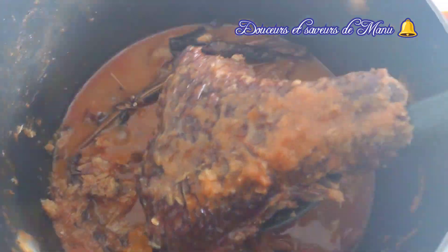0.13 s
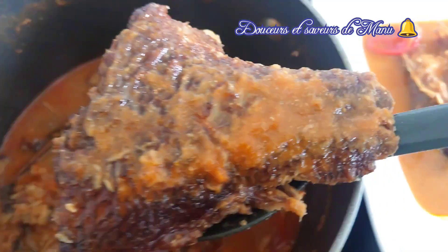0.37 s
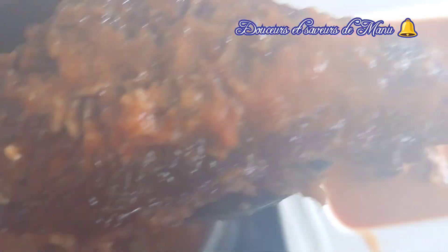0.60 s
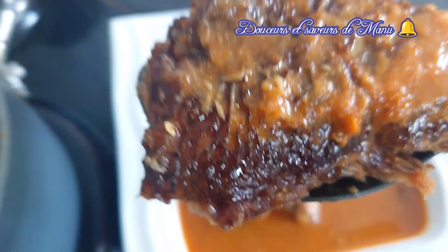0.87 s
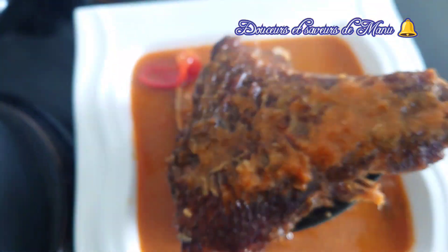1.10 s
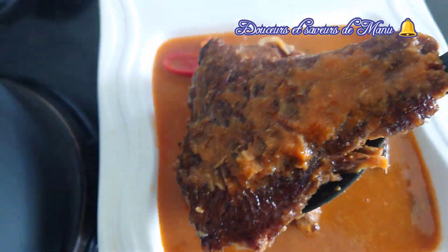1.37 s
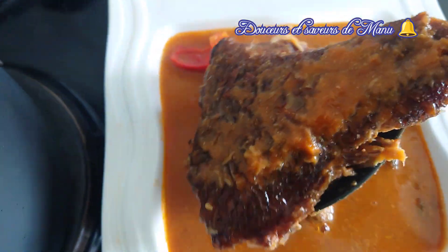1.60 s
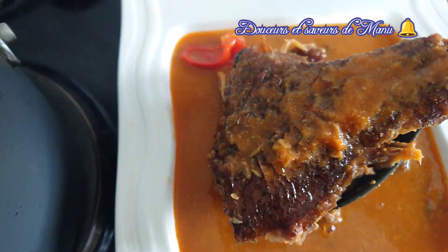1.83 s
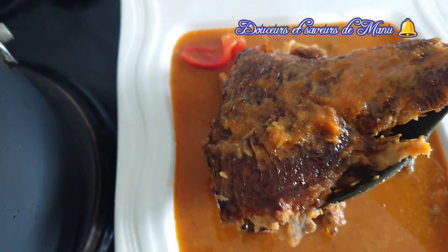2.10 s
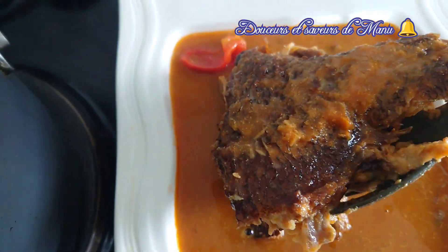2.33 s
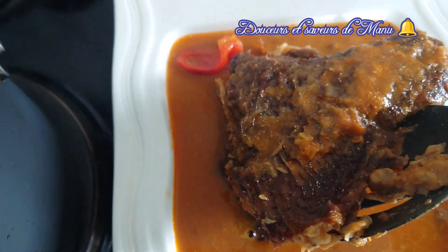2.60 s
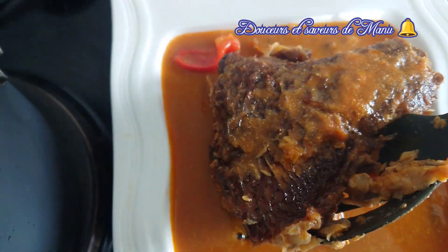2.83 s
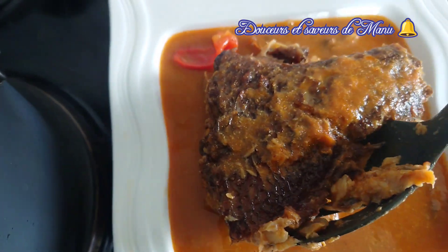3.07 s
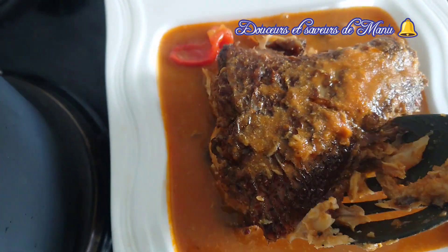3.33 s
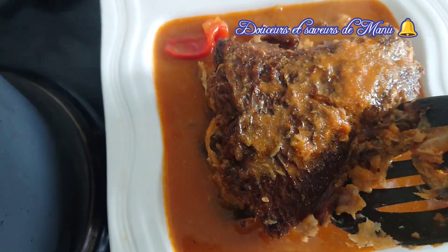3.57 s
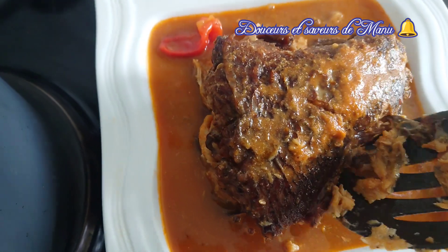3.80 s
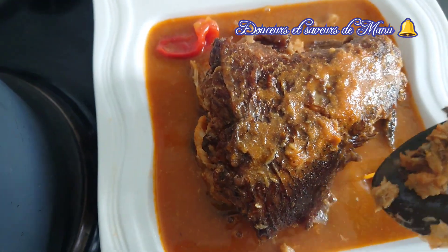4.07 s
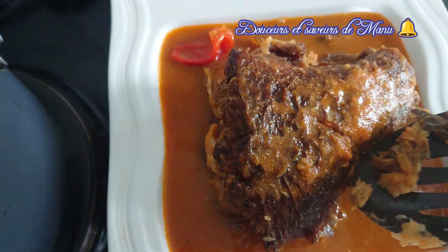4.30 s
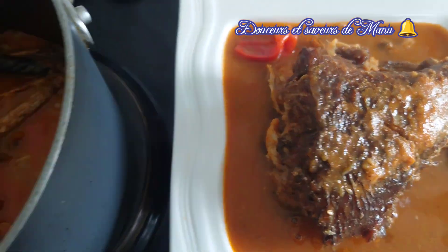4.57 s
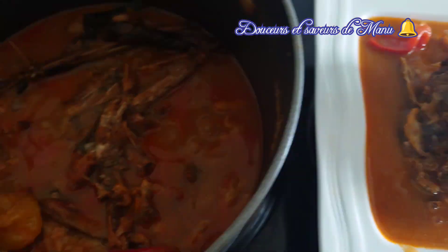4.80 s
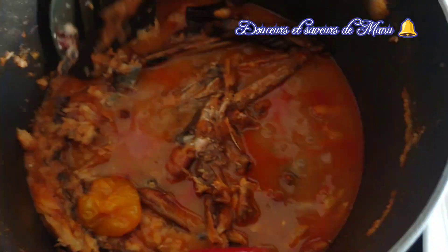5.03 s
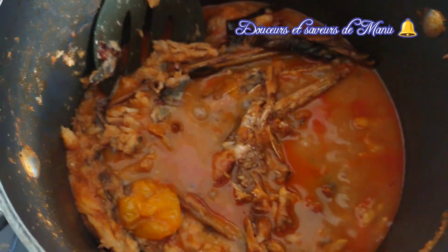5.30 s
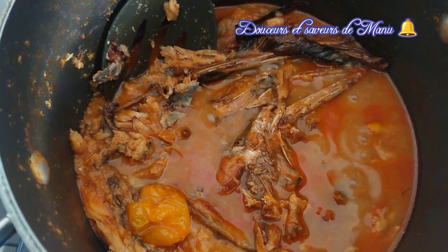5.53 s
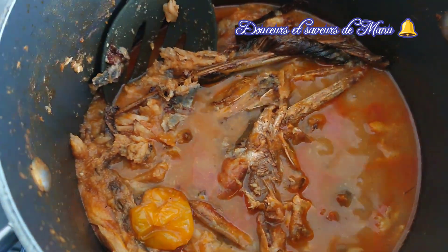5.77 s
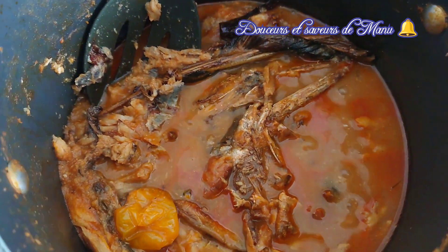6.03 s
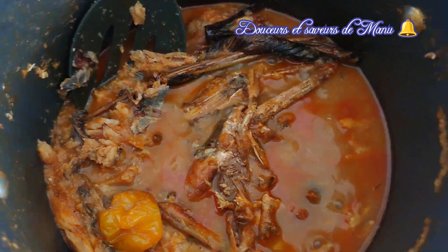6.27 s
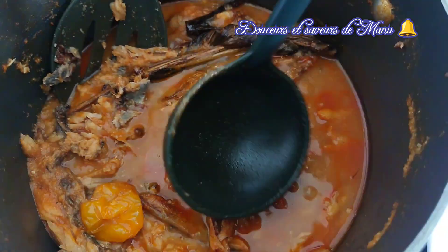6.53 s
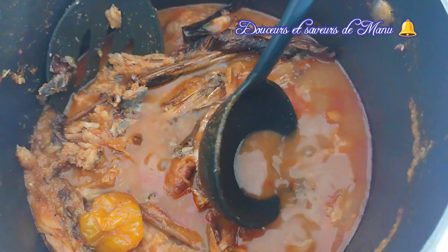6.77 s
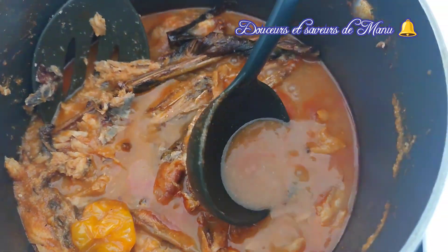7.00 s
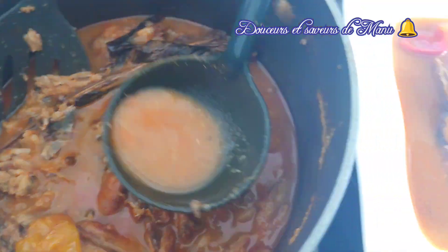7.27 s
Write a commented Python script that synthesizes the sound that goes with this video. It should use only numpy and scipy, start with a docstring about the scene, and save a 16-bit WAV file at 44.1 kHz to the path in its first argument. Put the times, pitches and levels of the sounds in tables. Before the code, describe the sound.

Thick sauce bubbles quietly in a pot, fainter as the microphone swings to a plate, then close again with utensil knocks and a short ladle scrape.

```python
"""Kitchen: a thick sauce simmers in a steel pot, heard by a hand-held microphone pair that swings aside to a plate
and back over the pot. Swarms of damped rings make the bubbling and fizz; single bursts make sharper snaps and plops.
A spatula and a ladle knock the pot (decaying modes, noise cracks, a click and a low thump) and the ladle scrapes
it once (resonant noise). The hand's rumble and rustle and the kitchen hush are filtered noise; sparse decaying
echoes surround pot and knocks."""
import sys
import numpy as np
from scipy import signal
from scipy.io import wavfile
from scipy.ndimage import uniform_filter1d, map_coordinates

SR = 44100
rng = np.random.default_rng(int(sys.argv[2]) if len(sys.argv) > 2 else 0)


def unload_wav(signal):
    """Save mono or channel-first audio to the path in sys.argv[1] as 16-bit WAV at rate SR, clipped to [-1, 1]."""
    wavfile.write(
        sys.argv[1],
        SR,
        np.round(np.clip(np.atleast_2d(signal).T, -1, 1) * 32767).astype(np.int16),
    )


def magnitude_from_level(level_db):
    """Linear magnitude for a level in decibels (20 dB per decade)."""
    exponent = np.asarray(level_db, float) / 20
    return 10 ** exponent


N = 325458

# Swing of the microphones. Each row: time in seconds, turn away from the pot (0-1).
ASIDE = [(0, 0.12), (.5, 0.26), (1.0, 0.86), (4.5, 0.89), (5.2, 0.39), (5.6, 0.09), (6.3, 0.23), (6.8, 0.3),
         (7.38, 0.1)]
# Port balance turned aside. Each row: frequency in Hz, left over right in dB.
SHADOW = [(60, 42), (200, -13), (500, -5), (1300, 18.5), (2400, 5.5), (4400, 20), (8000, -6.5), (15000, 44)]
# Port balance over the pot. Each row: frequency in Hz, left over right in dB.
FACING = [(60, 45), (180, 2.5), (550, 1.5), (1650, 8), (4970, 7), (15000, -2)]
# Spectrum of the fizz. Each row: frequency in Hz, relative density in dB per Hz.
FIZZ = [(1650, -32.5), (2800, -7), (3360, -6.5), (3830, 2), (4150, 0.5), (5850, 5.5), (6670, -9),
        (8000, -35), (10200, -16), (14400, -59), (16000, -30)]
# Likeness of the two ports in background noise. Each row: frequency in Hz, left-right likeness (0-1).
ALIKE = [(30, 0.71), (130, 0.78), (400, 1), (1000, 0.064), (4000, 0.021)]


def evened(x):
    """Scales to rms 1."""
    return x / np.sqrt(np.mean(x ** 2) + 1e-20)


def read(points, hz):
    """A spectrum table at the given frequencies, interpolated over log frequency."""
    f, value = np.transpose(points)
    return np.interp(np.log(hz + 1), np.log(f + 1), value)


def curve(rows):
    """A time table at every sample."""
    s, value = np.transpose(rows)
    return np.interp(np.arange(N) / SR, s, value)


def turned_aside():
    """Turn away from the pot at every sample, 0-1."""
    return np.clip(curve(ASIDE), 0, 1)


def coloured(x, points, share=1):
    """Causal minimum-phase filter with the gain of a spectrum table, its dB scaled by share."""
    db = share * read(points, abs(np.fft.fftfreq(4096, 1 / SR)))
    log_gain = np.log(magnitude_from_level(np.maximum(db, -100)))
    taps = np.fft.ifft(np.exp(np.conj(signal.hilbert(log_gain)))).real[:2048]
    return signal.oaconvolve(x, taps[None] if x.ndim > 1 else taps, axes=-1)[..., :x.shape[-1]]


def add(mix, s, sound, pan_db=0):
    """Mixes a sound in at a time, left over right by pan_db."""
    part = mix[:, round(s * SR):][:, :sound.shape[-1]]
    part += magnitude_from_level([[pan_db / 2], [-pan_db / 2]]) * sound[..., :part.shape[1]]


def burst(hz, cycles, rise):
    """A damped ring whose pitch climbs from hz, as a bubble's does while its cavity opens."""
    turns = np.arange(round(3 * cycles * SR / hz)) * hz / SR
    return np.exp(-turns / cycles * 2) * np.sin(2 * np.pi * turns * (1 + rise * turns / cycles))


def random_sizes(chance, spread_db):
    """Bursts at random samples, with exponentially spread levels in dB."""
    return magnitude_from_level(spread_db * np.minimum(rng.exponential(1, N), 4)) * (rng.random(N) < chance)


def swarm(lo_hz, hi_hz, per_s, spread_db, cycles, dense, tick, count=28):
    """Clumped bursts of many pitches at random moments over a dense noise bed of tiny ones."""
    clumps = magnitude_from_level(3.0 * evened(uniform_filter1d(rng.standard_normal(N), 1500)))
    out = np.zeros(N)
    for hz in np.geomspace(lo_hz, hi_hz, count):
        sizes = random_sizes(clumps * per_s / count / SR, spread_db)
        bubble = burst(hz, cycles * rng.uniform(1.0, 1.08), 0.05)
        bubble[1] += tick  # the skin tears with a tick across all bands
        out += signal.oaconvolve(sizes, bubble * np.sqrt(hz) / np.linalg.norm(bubble))[:N]
    return evened(evened(out) + dense * rng.standard_normal(N))


def simmer():
    """Low bubbling rings the air in the pot; the fizz above it is small bursts at the surface."""
    # Strength of the bubbling. Each row: time in seconds, level in dB.
    strength = [(0.0, -55.5), (0.37, -55.5), (0.74, -55), (1.09, -62.5), (1.31, -63.5), (1.93, -56.5),
                (2.67, -56.5), (3.33, -61), (3.62, -59.5), (4.77, -58), (5.22, -49.5), (5.86, -54.5),
                (6.04, -49), (6.49, -51.5), (7.09, -50.5), (7.38, -53.5)]
    # Bubbling turned aside. Each row: frequency in Hz, relative density in dB per Hz.
    bubbling_far = [(88, -45.5), (150, -3.5), (323, -4), (554, 2.5), (948, -9.5), (1270, -4), (1500, -11),
                    (1710, -22.5), (1920, -7), (2150, -15), (2350, -8.5), (2820, -22), (3200, -12),
                    (4160, -65), (7040, -120)]
    # Bubbling over the pot. Each row: frequency in Hz, relative density in dB per Hz.
    bubbling_near = [(88, -48.5), (150, -24), (285, -1.5), (540, -5), (637, -2.5), (1040, -10.5),
                     (1310, -10.5), (2380, -18), (3200, -26.5), (4160, -71), (7040, -120)]
    mean_db, fizz_db, spits_db = -55.5, -66, -82.5  # fizz and spits: level where the simmer is at mean_db
    fizz_follows = 1.13  # the fizz swings more than the bubbling
    aside, simmer_db = turned_aside(), curve(strength)

    bubbles = swarm(207.5, 2810, 900, 3.73, 4.95, 0.57, 0.39)
    gulps = swarm(244, 2890, 800, 4.43, 2.2, 0.23, 0.13)  # close up, the bubbles are short round pulses
    low = aside * evened(coloured(bubbles, bubbling_far))
    low += (1 - aside) * evened(coloured(gulps, bubbling_near))
    crackle = swarm(3300, 7000, 900, 4.6, 7, .35, .55)
    high = evened(coloured(crackle, FIZZ))
    lively = magnitude_from_level(fizz_follows * (simmer_db - mean_db))
    sauce = magnitude_from_level(simmer_db) * low + magnitude_from_level(fizz_db) * lively * high
    # the housing shadows one port more as it turns away
    heard = np.array([aside * coloured(sauce, SHADOW, side) + (1 - aside) * coloured(sauce, FACING, side)
                      for side in (.5, -.5)])
    return heard + magnitude_from_level(spits_db) * lively * spits()


def spits():
    """Sparse sharp ticks of skin tearing at random: decaying noise that reaches the top of the treble."""
    per_s, spread_db, decay_s = 51, 2, 0.00088
    sizes = random_sizes(per_s / SR, spread_db)
    swell = signal.lfilter([1], [1, -np.exp(-1 / (decay_s * SR))], sizes)
    noise = rng.standard_normal((2, N))
    return evened(np.gradient(np.gradient(noise, axis=1), axis=1) * swell)


def pops():
    """Bright snaps and round plops of large bubbles; the snap at 5.119 s is a knock's bright click."""
    # Each row: start in seconds, nominal level in dB, starting pitch in Hz, relative edge level in dB.
    snap_rows = [(0.2214, -44, 4760, -41), (0.35, -34.5, 4570, -49), (0.4626, -43.5, 4770, -18),
                 (0.58, -47, 5770, -17), (0.6608, -40, 5000, -42), (0.7347, -45.5, 5900, -15),
                 (0.9306, -48.5, 3680, -44), (1.8714, -41, 5100, -46), (1.907, -48, 4270, -37),
                 (2.0593, -44, 6000, -32), (2.088, -51, 4950, -12), (2.1264, -39.5, 5180, -39),
                 (2.4584, -47.5, 5850, -40), (2.701, -45.5, 4470, -8.5), (2.7427, -51, 4280, -30),
                 (3.406, -55, 5760, -11), (3.5476, -54.5, 3660, -8), (3.5669, -48.5, 5800, -30),
                 (4.067, -49, 4530, -40), (4.356, -52, 4700, -32), (4.8995, -50, 5390, -25),
                 (4.933, -42.5, 5230, -12), (4.998, -37, 5930, -24), (5.064, -38, 5960, -24),
                 (5.0955, -44, 4560, -15), (5.119, -41.5, 4470, -8), (5.356, -46.5, 5150, -28),
                 (5.473, -46, 4670, -13), (5.6123, -40, 5300, -34), (5.6717, -43, 5470, -42),
                 (5.8997, -46, 6440, -23), (6.369, -46.5, 4900, -37), (6.4446, -45, 4560, -17),
                 (6.497, -46, 5770, -37), (6.7285, -47, 5570, -32), (6.923, -44.5, 5830, -13),
                 (7.016, -45.5, 5930, -16), (7.208, -46, 5900, -24)]
    # Each row: start in seconds, nominal level in dB, starting pitch in Hz.
    plop_rows = [(0.048, -41.5, 470), (0.104, -37.5, 546), (0.133, -38.5, 494), (0.162, -37.5, 689),
                 (0.189, -37.5, 790), (0.219, -39, 656), (0.242, -39, 651), (0.262, -47, 535),
                 (0.275, -35.5, 690), (0.39, -41, 1010), (0.398, -37, 690), (0.432, -40, 656),
                 (0.463, -36.5, 665), (0.501, -42, 623), (0.535, -37.5, 655),  (1.187, -43, 1240),
                 (1.465, -40.5, 1240), (1.595, -42.5, 1890), (1.692, -46, 1890), (1.774, -43, 1330),
                 (1.834, -43.5, 1270), (2.125, -49, 1250), (2.984, -45.5, 1230), (3.231, -47, 1870),
                 (3.71, -48, 1100), (3.955, -45.5, 1250), (3.999, -43.5, 2340), (4.044, -39, 1270),
                 (4.453, -45, 1300), (4.454, -45, 1850), (5.242, -38.5, 596), (5.409, -36, 650),
                 (5.899, -34, 617), (6.383, -37.5, 1250), (6.456, -39, 716), (6.495, -39, 545),
                 (6.55, -35.5, 624), (6.746, -38, 568), (6.8, -32.5, 2390), (7.0, -37.5, 651)]
    snaps_left_db = 15.5
    out = np.zeros((2, N))
    t = np.arange(400) / SR
    swell = (1 - np.exp(-t / .0005)) * np.exp(-t / .0011)
    for s, db, hz, edge_db in snap_rows:
        spray, edge = rng.standard_normal((2, 400))
        spray = coloured(coloured(spray * swell, FIZZ), [(6500, 7.5), (9000, -6.5)])
        snap = magnitude_from_level(1) * spray / abs(spray).max()
        snap += magnitude_from_level(edge_db + 7.5) * np.gradient(np.gradient(edge)) * swell
        add(out, s, magnitude_from_level(db) * burst(hz, 7, .02), snaps_left_db)
        add(out, s, magnitude_from_level(db) * snap, snaps_left_db)
    turn = turned_aside()
    for s, db, hz in plop_rows:
        aside = turn[round(s * SR)]
        pan_db = aside * read(SHADOW, hz) + (1 - aside) * read(FACING, hz)
        add(out, s, magnitude_from_level(db) * burst(hz, 0.74 + hz / 300, 0.02), pan_db)
        splash = burst(2.3 * hz, 1.9, 0.092) * (1 - aside)  # heard close up
        add(out, s, magnitude_from_level(db - 8) * splash, pan_db)
    return out


def ring(modes, t):
    """Dying modes, excited a little differently by each blow; high ones reach the ports out of step."""
    hz, db, t60 = np.transpose(modes)[:, :, None]
    size, pitch, start, step = rng.standard_normal((4, len(modes), 1))
    phase = 2 * np.pi * hz * (1 + .006 * pitch) * t + .45 * start
    skew = step * np.minimum((hz / 2400) ** 2, 1.2)
    sound = magnitude_from_level(db + size - 60 * t / t60) * np.sin([phase + skew, phase - skew])
    return sound.sum(1) / np.linalg.norm(magnitude_from_level(db)) * (1 - np.exp(-t / 0.00025))


def knocks():
    """Each blow rings pot and utensil, duller the longer the contact, and cracks; soft bumps ring a hollow."""
    # Each row: start in seconds, nominal pot, utensil and crack levels in dB, contact time in ms.
    blows = [(5.119, -53, -39, -42, 0.22), (5.128, -31, -34, -46, 1.2), (5.963, -15.5, -58, -34.5, 0.19),
             (5.974, -9.5, -26, -38, 0.76), (5.986, -23, -23, -43.5, 0.56), (5.998, -25.5, -31, -42, 0.55),
             (6.012, -26, -40, -51, 0.65), (6.153, -18, -11.5, -17.5, 0.09), (6.1588, -28, -14, -48, 0.48),
             (6.168, -21, -24, -31, 0.17), (6.189, -25, -18.5, -27, 0.83), (6.196, -30, -17, -53, 2.8),
             (6.207, -19, -22, -60, 1.9), (6.222, -36, -27, -59, 4.3), (7.276, -49, -48, -38.5, .5),
             (7.292, -36, -30, -48, 0.7)]
    # Soft bumps sounding only the utensil's hollow. Each row: start in seconds, nominal level in dB.
    bumps = [(5.128, -36), (5.142, -40), (7.277, -37), (7.292, -27), (7.3005, -32), (7.309, -35),
             (7.331, -38)]
    # Modes of the hollow, pot and utensil. Each row: frequency in Hz, relative level in dB, t60 in seconds.
    hollow_modes = [(470, 0, .08), (100, -12, .2), (960, -16, .03)]
    pot_modes = [(287, -6.5, 0.061), (349, -7, 0.047), (473, 1.5, 0.094), (562, 4, 0.063), (645, 5, 0.07),
                 (772, 3, 0.06), (869, 10.5, 0.05), (1104, 1, 0.083), (1352, 5.5, 0.076), (1590, 13, 0.022),
                 (1760, 8.5, 0.028), (2000, 2, 0.098), (2010, -0.5, .05), (2310, -4, 0.098),
                 (2490, 12, 0.014), (2830, -0.5, 0.049), (4000, -11, 0.13)]
    utensil_modes = [(209, -20, 0.23), (281, -5.5, 0.057), (310, -13, 0.092), (385, 3.5, 0.062),
                     (522.6, 8, 0.063), (619, -1, 0.11), (742, 5.5, 0.034), (1470, -13.5, 0.076),
                     (2225, -2, 0.07), (2460, 6, 0.026), (4710, -10, 0.056)]
    # Balance of the blows before weighting per port. Each row: frequency in Hz, left over right in dB.
    balance = [(125, -3), (500, -4.5), (2000, -1), (4000, -1.3), (8000, 3), (12000, -3.5)]
    crack_side = 0.84  # noise opposed between the ports, relative to the common noise
    crack_colour = [(150, -11), (600, 1), (2400, 6.5), (3200, 1.0), (4800, 3.5), (6300, -4.0),
                    (8000, -19.5), (11000, -24.0), (16000, -37)]
    rattle_colour = [(150, -41), (300, -6), (900, -19), (2500, -30)]
    out, t = np.zeros((2, N)), np.arange(SR // 4) / SR
    for s, pot_db, utensil_db, crack_db, contact_ms in blows:
        crack = np.array([[1, crack_side], [1, -crack_side]]) @ rng.standard_normal((2, len(t)))
        crack = coloured(crack * (np.exp(-t / 0.0043) + 0.26 * np.exp(-t / 0.028)), crack_colour)
        body = magnitude_from_level(pot_db) * ring(pot_modes, t) + magnitude_from_level(utensil_db) * ring(utensil_modes, t)
        rattle = coloured(rng.standard_normal(len(t)), rattle_colour) * np.exp(-t / 0.028)  # loose parts
        body += magnitude_from_level(utensil_db - 2) * rattle
        soft = np.exp(-2 * np.pi / (max(contact_ms, .05) * SR / 1000))
        for _ in range(2):
            body = signal.lfilter([1 - soft], [1, -soft], body)
        body = coloured(body, [(20, -40), (140, -20), (260, 0), (16000, 0)])  # too small to push deep bass
        left, right = body + magnitude_from_level(crack_db) * crack
        add(out, s, np.array([coloured(left, balance, 0.35), coloured(right, balance, -0.63)]))
    for s, db in bumps:
        add(out, s, magnitude_from_level(db) * ring(hollow_modes, t) * (1 - np.exp(-t / 0.0018)))
    return out


def scrape():
    """The ladle sticks and slips: patchy noise through resonances squeals in one short stroke."""
    # Resonances of the squeal. Each row: frequency in Hz, width in Hz, relative level in dB.
    resonances = [(2750, 250, -8), (3500, 200, -6), (3900, 150, -2), (4850, 200, -1), (5500, 400, 0)]
    loudest_s, rise_s, fall_s, level_db = 7.25, 0.015, 0.012, -40
    stick_slip = magnitude_from_level(3 * evened(uniform_filter1d(rng.standard_normal(N), size=60)))
    rub = rng.standard_normal((2, N)) * stick_slip
    squeal = sum(magnitude_from_level(db) * evened(signal.lfilter(*signal.iirpeak(hz, hz / width, SR), rub))
                 for hz, width, db in resonances)
    squeal = coloured(squeal, [(1500, -25), (2600, -8), (6200, -7.5), (8000, -17), (16000, -22)])
    late = np.arange(N) / SR - loudest_s
    stroke = np.exp(-abs(late) / np.where(late < 0, rise_s, fall_s))
    return magnitude_from_level(level_db) * stroke * evened(squeal)


def kitchen(x):
    """Sparse echoes of random sign from pot walls and room, each band dying at its own speed."""
    # Each row: frequency in Hz, t60 in seconds.
    decay = [(100, 0.1), (500, 0.066), (2000, 0.045), (6000, 0.03), (14000, 0.039)]
    taps = np.zeros((2, SR // 2))
    at = np.arange(60, SR // 2 - 20, 20)
    at = at + rng.integers(0, 20, (2, len(at)))
    np.put_along_axis(taps, at, rng.choice([-1., 1.], at.shape), 1)
    hz, t, z = signal.stft(taps, SR, nperseg=256)
    tail = signal.istft(z * magnitude_from_level(-60 * t / read(decay, hz)[:, None]), SR, nperseg=256)[1]
    return signal.oaconvolve(x, tail / np.linalg.norm(tail[0]), axes=1)[:, :N]


def ports(x):
    """Turned aside, the right port hears the pot later."""
    lag_s = 0.000418
    late = np.arange(N) - turned_aside() * lag_s * SR
    return np.array([x[0], map_coordinates(x[1], [late], order=3, mode="nearest")])


def air(points, alike, patchy_db):
    """Two partly alike noises whose level drifts in patches over time and frequency."""
    frames, hz = N // 256 + 5, np.fft.rfftfreq(1024, 1 / SR)
    a, b, c, d, patches = rng.standard_normal((frames, 513, 5)).T
    patches = evened(uniform_filter1d(uniform_filter1d(patches, 8, 0), 12, 1))
    same, left = np.clip(read(alike, hz), -1, 1)[:, None], a + 1j * b
    z = np.array([left, same * left + np.sqrt(1 - same ** 2) * (c + 1j * d)])
    z *= magnitude_from_level(read(points, hz)[:, None] + patchy_db * patches)
    return evened(signal.istft(z, nperseg=1024, noverlap=768)[1][:, :N])


def hand():
    """Grip shifts rumble and rustle; low thrums swell through, the one at 6.22 s being a knock's deep thump."""
    # Grip shifts. Each row: middle in seconds, 1/e half length in seconds, rumble and rustle levels in dB.
    moves = [(0, 0.17, -56, -65), (1.047, 0.15, -70, -56.5), (2.422, 0.26, -63, -59), (2.6, 0.16, -91, -62),
             (3.076, 0.08, -60, -72), (3.935, 0.29, -98, -68.5), (4.817, 0.18, -98, -59.5),
             (5.463, 0.4, -66.5, -68), (6.255, 0.15, -53, -64), (7.37, 0.26, -65, -56)]
    # Thrums, the last a knock's thump. Each row: middle in s, 1/e half length in s, level in dB, frequency in Hz.
    thrums = [(2.227, 0.065, -58, 108), (2.987, .1, -54, 117), (6.221, 0.039, -41, 112)]
    # Spectra. Each row: frequency in Hz, relative density in dB per Hz.
    rumble_colour = [(20, -19), (45, -10.5), (68, 6.5), (84, 4), (102, -17), (135, -18), (200, -38),
                     (600, -100)]
    rustle_colour = [(80, -51), (130, -7.5), (200, 7), (350, -0.5), (550, -3.5), (1500, -100)]
    still_rumble_db, still_rustle_db, thrum_width_hz = -66, -73.5, 31
    t = np.arange(N) / SR
    s, half_s, rumble_db, rustle_db = np.transpose(moves)[:, :, None]
    swell = np.exp(-((t - s) / half_s) ** 2)
    rumble = magnitude_from_level(still_rumble_db) + (magnitude_from_level(rumble_db) * swell).sum(0)
    rustle = magnitude_from_level(still_rustle_db) + (magnitude_from_level(rustle_db) * swell).sum(0)
    thrum = np.zeros(N)
    for s, half_s, db, hz in thrums:
        resonance = signal.iirpeak(hz, hz / thrum_width_hz, SR)
        tone = evened(signal.lfilter(*resonance, rng.standard_normal(N)))
        thrum += magnitude_from_level(db) * np.exp(-((t - s) / half_s) ** 2) * tone
    return thrum + rumble * air(rumble_colour, ALIKE, 3.4) + rustle * air(rustle_colour, ALIKE, 2.0)


def hush():
    """The kitchen's quiet background: patchy noise, alike in the bass and nearly separate in the treble."""
    # Each row: frequency in Hz, relative density in dB per Hz.
    colour = [(12, -11), (20, -1), (277, -10.5), (399, -0.5), (897, -6), (1220, -5), (1710, -16),
              (1960, -17), (3440, -20.5), (5680, -26), (6700, -27), (7600, -43.5), (10200, -35),
              (16000, -41)]
    level_db = -58.5
    return magnitude_from_level(level_db) * air(colour, ALIKE, 2.73)


def scene():
    """Sauce, knocks and scrape with their echoes, over hand rumble and hush."""
    sauce, hits = simmer() + pops(), knocks() + scrape()
    wet = kitchen(magnitude_from_level(-7.5) * sauce + magnitude_from_level(-11) * hits)
    return ports(sauce + hits) + wet + hand() + hush()


def roll_off(x):
    """The treble ends steeply here."""
    return signal.sosfilt(signal.butter(12, 15900, fs=SR, output="sos"), x)


def record(dry):
    """Returns the finished mix as stored."""
    return roll_off(dry)


dry = scene()
out = record(dry)
unload_wav(out)
```